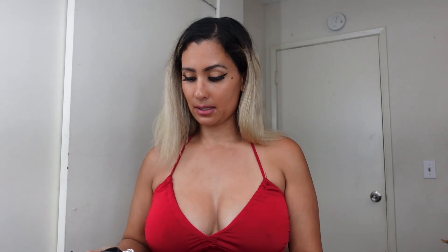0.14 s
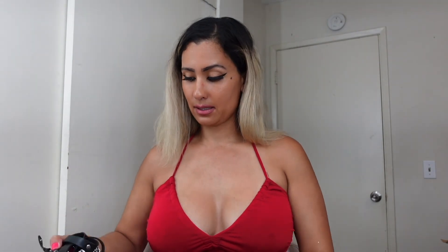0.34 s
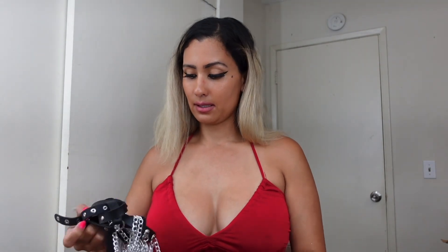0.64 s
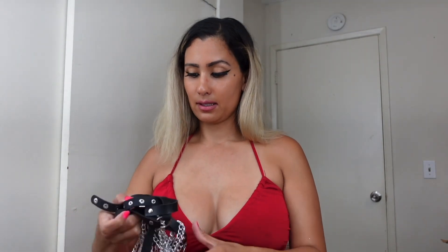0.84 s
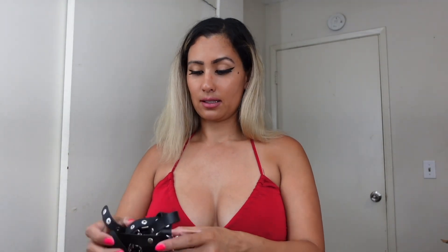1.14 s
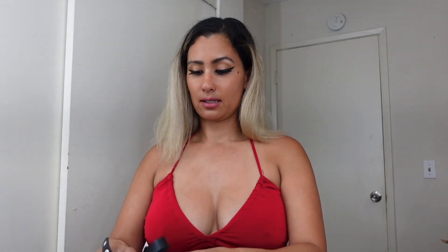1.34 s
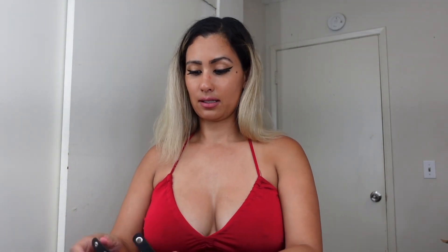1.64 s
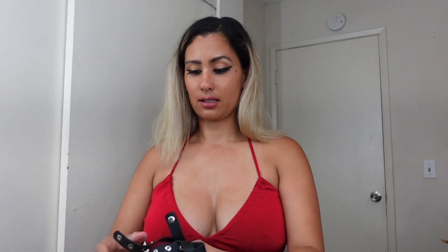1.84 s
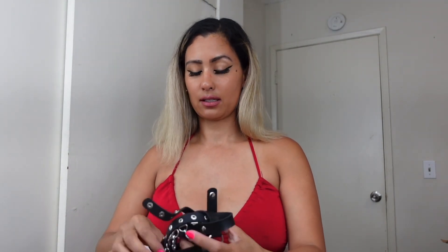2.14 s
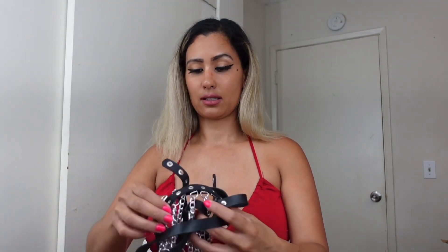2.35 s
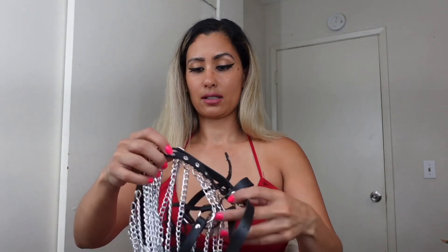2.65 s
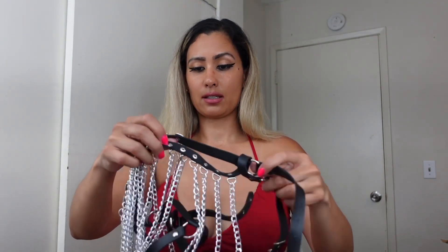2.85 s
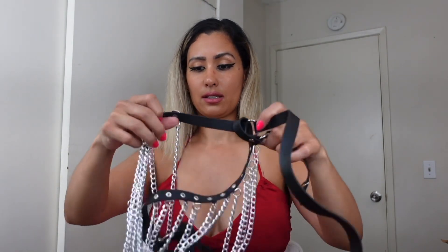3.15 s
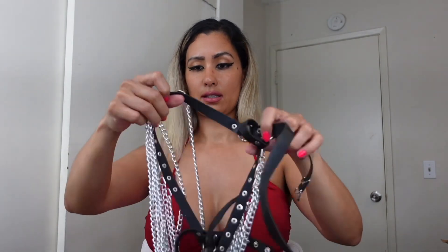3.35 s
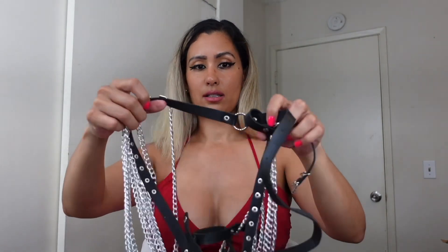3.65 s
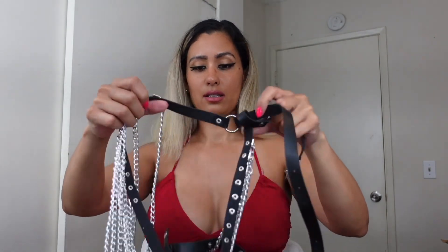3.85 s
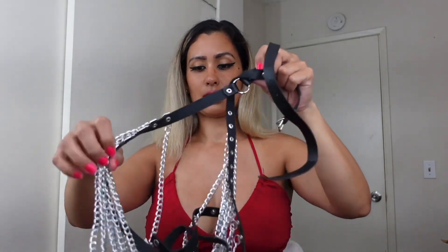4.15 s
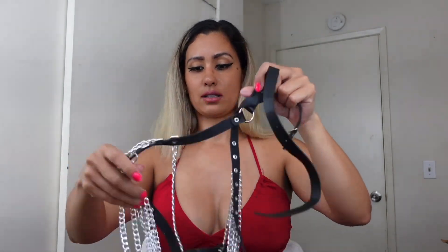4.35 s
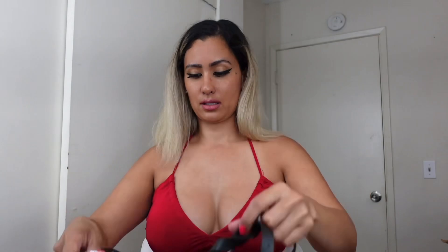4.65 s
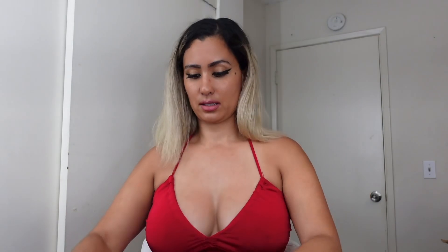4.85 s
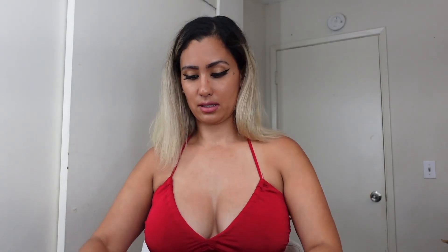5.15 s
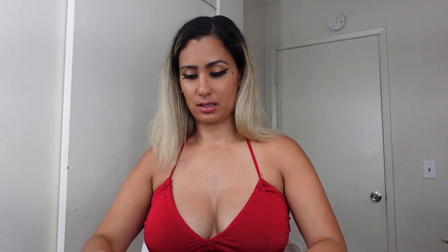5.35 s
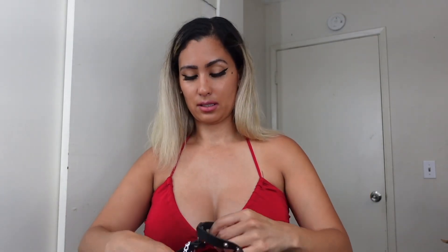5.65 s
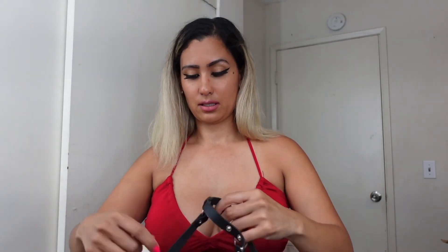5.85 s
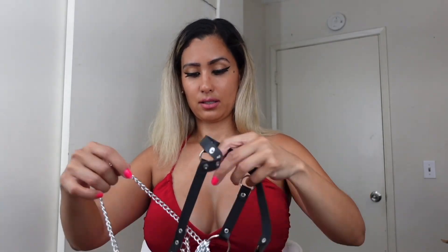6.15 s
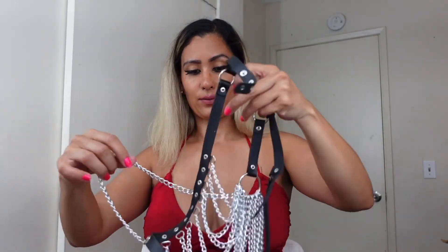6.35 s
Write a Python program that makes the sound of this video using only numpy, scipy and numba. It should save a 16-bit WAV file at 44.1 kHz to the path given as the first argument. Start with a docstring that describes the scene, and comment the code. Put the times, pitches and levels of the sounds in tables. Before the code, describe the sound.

Thin metal chains on leather straps clatter out of a crackling plastic bag, then jingle and tick lightly as hands untangle them in a small room.

```python
"""In a small room, thin metal chains on leather straps are pulled from a plastic bag, shaken and dropped on a table.
Links tick and ring in short high modes, bag and straps crackle lower down, and single hard knocks stand out.
Rattle, crackle and thuds are crowds of tiny fading sine waves; each knock adds a tick, a body ring and bounces.
The room hums softly underneath as shaped noise, wide in the two channels, while the chains sit near the middle."""
import sys
import numpy as np
from scipy import signal
from scipy.fft import rfft, irfft, next_fast_len
from scipy.io import wavfile
from numba import njit

SR = 44100
rng = np.random.default_rng(int(sys.argv[2]) if len(sys.argv) > 2 else 0)


def store_pcm(level_fs):
    """Save levels as 16-bit WAV."""
    pcm = np.round(np.clip(level_fs, -1, 1) * 32767).astype(np.int16)
    wavfile.write(sys.argv[1], SR, np.atleast_2d(pcm).T)


N = 286683  # samples, about 6.5 s


def undb(db):
    """Turn a level in dB into a gain."""
    return 10 ** (np.asarray(db) / 20)


def unit(x):
    """Scale a sound to an average strength (rms) of 1."""
    return x / np.sqrt(np.mean(x ** 2))


def high(x, hz):
    """Take away what lies below a pitch, with a second-order high-pass."""
    return signal.sosfilt(signal.butter(2, hz, "high", fs=SR, output="sos"), x)


def on_log(hz, table):
    """Read a table of (f/Hz, value) along a log-frequency axis."""
    f, v = np.transpose(table)
    return np.interp(np.log(hz + 1), np.log(f), v)


@njit
def rings(n, start, hz, t60, size):
    """Each grain is a sine wave that starts abruptly and fades by 60 dB in its t60."""
    out = np.zeros(n)
    for g in range(len(start)):
        # multiplying by this each sample turns the wave a little and shrinks it a little
        step = np.exp(2j * np.pi * hz[g] / SR - np.log(1000) / (t60[g] * SR))
        wave = size[g] + 0j
        for i in range(start[g], min(n, start[g] + int(t60[g] * SR))):
            wave *= step
            out[i] += wave.imag
    return out


def ring(s, hz, t60, size):
    """Place fading sines at times in seconds, with pitch and fade time kept in range."""
    start = (s * SR).astype(np.int64)
    return rings(N, start, np.clip(hz, 100, .45 * SR), np.clip(t60, 2e-4, 1), size)


LARGEST = 3.72  # no grain stands more than this many scatter steps over the smallest


def moments(rate_hz, scatter_db):
    """Pick random times, with many small grains and a few larger ones."""
    count = int(rate_hz * N / SR)
    steps = np.minimum(rng.exponential(size=count), LARGEST)
    s = rng.random(count) * N / SR
    sign = rng.choice([-1., 1.], count)
    return s, undb(scatter_db * steps) * sign


def grains(rate_hz, centre_hz, octaves, cycles, scatter_db, db):
    """Dense short snaps of scattered pitch, with little sound far below their centre pitch."""
    s, size = moments(rate_hz, scatter_db)
    hz = centre_hz * 2 ** (octaves * rng.standard_normal(len(s)))
    snaps = ring(s, hz, cycles / hz, size)
    return undb(db) * unit(high(snaps, 0.5 * centre_hz))


# colour of the hum, before its overall level is set: f/Hz, level/dB (per Hz)
HUM_COLOUR = [(20, -45), (45, -25), (60, -17.5), (100, -10.5), (125, -5.5), (185, -1.5), (300, -4),
              (450, -5), (800, -9.5), (1500, -11), (2500, -16.5), (4000, -22.5), (8000, -24), (16000, -33)]
# how alike left and right are in the hum: f/Hz, correlation (0 to 1)
HUM_LIKENESS = [(60, 0.54), (130, 0.36), (290, 0.37), (640, 0.094), (1400, 0.033), (3100, 0.91), (6800, 1),
                (15000, .99)]
# a soft resonance in the hum: f/Hz, width/Hz (at half height), level/dB
HUM_RESONANCE = (600, 120, -60.5)
HUM_DB = -54.5


def hum():
    """Steady air and machine noise of the house: random noise given a colour, plus one soft resonance."""
    size = next_fast_len(N)
    hz = np.arange(size // 2 + 1) * SR / size
    alike = np.clip(on_log(hz, HUM_LIKENESS), 0, 1)
    peak_hz, width_hz, peak_db = HUM_RESONANCE
    broad = undb(on_log(hz, HUM_COLOUR))
    resonance = 1 / (1 + (2 * (hz - peak_hz) / width_hz) ** 2)

    def noise(shape):
        return irfft(rfft(rng.standard_normal(size)) * shape, size)[:N]

    out = 0
    for shape, db in ((broad, HUM_DB), (resonance, peak_db)):
        mid = noise(shape * np.sqrt(1 + alike))
        side = noise(shape * np.sqrt(1 - alike))
        out = out + undb(db) * unit(mid + side * np.array([[1], [-1]]))
    return out


# pulls, shakes and drops: t/s of the peak, rise/s, fall/s, clatter level/dB,
# fine sliding ticks level/dB, free ringing level/dB, bag and strap crackle level/dB
HAND_MOVES = [(0.0, .02, .06, -32.5, -58, -44, -20), (.082, 0.0035, 0.054, -28.5, -57, -55, -20),
              (.12, .02, 0.062, -25.5, -55, -50.5, -21), (0.151, 0.036, 0.033, -22.5, -53, -37.5, -20),
              (.25, 0.022, 0.066, -55, -45, -41, -66), (0.288, 0.013, 0.053, -39.5, -50, -52, -51),
              (.42, 0.21, 0.11, -39, -52.5, -45, -37.5), (.58, 0.016, 0.032, -45, -43, -42, -42),
              (.623, 0.0046, .05, -39, -58, -49, -34.5), (.72, 0.022, 0.06, -46, -48.5, -49.5, -51),
              (.78, 0.029, 0.047, -68, -68, -64, -44), (.925, .002, 0.081, -45.5, -44, -53, -49.5),
              (.97, 0.024, 0.26, -43.5, -45, -48.5, -49), (1.1, .15, 0.086, -43, -48.5, -42.5, -43),
              (1.232, .01, 0.093, -51, -49, -44, -48.5), (1.305, 0.029, .07, -49.5, -48, -42.5, -55),
              (1.43, 0.028, 0.075, -50.5, -48, -47, -56), (1.51, 0.11, 0.15, -52, -63, -45, -53),
              (1.59, 0.058, .06, -49.5, -48.5, -49, -53), (1.76, 0.28, 0.14, -56.5, -65, -68, -53.5),
              (2.15, 0.035, 0.096, -54.5, -50, -49.5, -59), (2.35, .1, 0.23, -58.5, -49, -54, -80),
              (2.5, 0.089, 0.15, -54, -55, -44.5, -64), (2.585, .08, 0.19, -46.5, -46, -49, -57),
              (2.69, .06, 0.17, -51, -49.5, -56, -60), (2.9, 0.17, 0.016, -51, -49.5, -48, -74),
              (3.01, 0.021, 0.56, -51.5, -48.5, -43, -60), (3.29, 0.26, 0.17, -51, -50.5, -46, -52),
              (3.55, .03, 0.036, -73, -61, -53, -60), (3.84, 0.051, 0.13, -60, -52, -57, -77),
              (4.0, .15, 0.3, -57, -55.5, -60, -68), (4.092, 0.016, 0.043, -48, -41, -43, -72),
              (4.212, 0.0089, 0.037, -53, -42.5, -53, -70), (4.3, 0.047, 0.14, -49.5, -47.5, -46.5, -56),
              (4.534, 0.0023, 0.038, -33.5, -62, -45, -34), (4.59, 0.017, 0.056, -40.5, -56, -45, -40),
              (4.635, .04, 0.039, -37, -48, -42, -29.5), (4.69, 0.094, 0.15, -43, -41, -44, -43),
              (4.84, 0.046, 0.11, -43.5, -51, -43.5, -41), (4.94, 0.014, 0.056, -46, -45.5, -50, -49),
              (5.07, 0.078, 0.013, -52.5, -53, -56, -58), (5.14, 0.017, 0.16, -47.5, -53, -57, -54),
              (5.28, 0.18, 0.079, -51.5, -48, -48.5, -51), (5.48, 0.085, .03, -42, -44, -43.5, -40.5),
              (5.522, 0.016, .025, -36, -54, -38, -28.5), (5.58, 0.097, .1, -47.5, -51, -50, -48.5),
              (5.72, 0.11, 0.11, -71, -53.5, -50.5, -56), (5.82, 0.069, 0.057, -46.5, -50.5, -51, -50.5),
              (5.909, 0.047, 0.067, -51, -50, -47, -54.5), (6.05, 0.11, 0.086, -53, -51.5, -50, -64),
              (6.1, .03, 0.044, -66, -64, -40.5, -65), (6.17, 0.033, 0.094, -65, -64, -52.5, -68),
              (6.35, 0.19, 0.18, -64, -63, -55, -67), (6.465, .03, .08, -73, -61, -49, -70)]
SLOPE_DB = 10  # gained over each rise time, lost over each fall time


def moves():
    """Each move swells and dies away; moves add up as powers, giving one gain for each layer."""
    t = np.arange(N) / SR
    power = np.zeros((4, N))
    for s, rise, fall, *db in HAND_MOVES:
        near = slice(max(0, int((s - 6 * rise) * SR)), int((s + 6 * fall) * SR))
        away = np.maximum((s - t[near]) / rise, (t[near] - s) / fall)
        power[:, near] += undb(np.array(db)[:, None] - SLOPE_DB * away) ** 2
    return np.sqrt(power)


FLURRY_HZ, FLURRY_DB = 60, 1.6  # jumps a second, and how much their sizes scatter
FLURRY_S, CALM = .008, 2.5  # sag time, and the steady share under the jumps


def flurries():
    """Contacts come in quick flurries: a gain that jumps at random and sags again."""
    jumps = np.zeros(N)
    s, size = moments(FLURRY_HZ, FLURRY_DB)
    jumps[(s * SR).astype(int) % N] = np.abs(size)
    sagging = signal.lfilter([1], [1, -np.exp(-1 / (FLURRY_S * SR))], jumps)
    return unit(CALM + sagging)


# bag and strap snaps: grains a second, centre f/Hz, spread/octaves, cycles to fade,
# size scatter/dB, level/dB (before the moves set the gain)
CRACKLE_GRAINS = (1303, 1696, 0.8, 13.5, 3.0, -3)


def crackle():
    """Bag and straps crackle: short snaps in the lower treble."""
    return grains(*CRACKLE_GRAINS)


# knocking links: grains a second, centre f/Hz, spread/octaves, cycles to fade,
# size scatter/dB, level/dB (before the moves set the gain)
CLATTER_GRAINS = (2210, 5004, 0.6, 12.5, 2.5, 0)


def clatter():
    """Chains clatter: crowded short snaps, higher than the crackle."""
    return grains(*CLATTER_GRAINS)


# fine ticks: grains a second, centre f/Hz, spread/octaves, cycles to fade,
# size scatter/dB, level/dB (before the moves set the gain)
SLIDING_GRAINS = (3700, 10950, 0.75, 4.1, 0.92, 3.6)


def sliding():
    """Sliding chains make very dense, very short ticks, high up."""
    return grains(*SLIDING_GRAINS)


# modes of one link: f/Hz, spread from link to link (fraction of f), level/dB, fade by 60 dB/s
LINK_MODES = [(4150, .05, -13, .02), (6100, .05, -14, .02), (8300, .025, 0, .035), (10250, .015, -7, .025),
              (10900, .02, -2, .035), (15400, .025, -13, .025)]


def links(s, size):
    """Every hit rings another link: same modes, slightly different pitch and balance."""
    chance = rng.standard_normal((len(s), 2, len(LINK_MODES)))
    out = np.zeros(N)
    for k, (hz, spread, db, t60) in enumerate(LINK_MODES):
        mode_hz = hz * (1 + spread * chance[:, 0, k])
        mode_size = size * undb(db + 2.65 * chance[:, 1, k])
        out += ring(s, mode_hz, np.full(len(s), t60), mode_size)
    return out


def ringing():
    """Links ring freely: many random hits, each sounding the modes of one link."""
    hits = moments(rate_hz=497, scatter_db=1.5)
    return undb(-0.8) * unit(links(*hits))


# dull thuds: grains a second, centre f/Hz, spread/octaves, cycles to fade,
# size scatter/dB, level/dB (before the gain below)
THUD_GRAINS = (380.5, 349, 0.63, 4.5, 4, -6)
# gain of a low rumble under the handling: t/s, level/dB
HANDLING_RUMBLE = [(0, -48), (.8, -60), (1.68, -52.5), (2.0, -60), (2.46, -57.5), (3.2, -70), (3.5, -60),
                   (4.2, -57.5), (4.5, -72), (5.7, -57.5), (5.9, -64), (6.5, -57)]
THUD_DB = -13.5  # thuds follow the crackle gain, this far below it


def thuds(crackle_gain):
    """Low grains make dull thuds along with the crackle, and a rumble under the handling."""
    rumble_gain = undb(np.interp(np.arange(N) / SR, *np.transpose(HANDLING_RUMBLE)))
    gain = np.hypot(crackle_gain * undb(THUD_DB), rumble_gain)
    return gain * grains(*THUD_GRAINS)


# single hard knocks: t/s, body level/dB, body f/Hz, treble crack level/dB and
# link ring level/dB (both relative to the body, before the offsets and mode levels added in use)
HARD_KNOCKS = [(0.0396, -15, 1540, -29, -27), (0.0802, 0, 2050, -41, -46), (0.1085, -13, 1570, -33, -30),
               (0.2339, -22.5, 1980, -31, -18), (0.293, -18, 2350, -34, -31),
               (0.3302, -23.5, 1680, -20, -20), (0.4014, -24, 2310, -22, -20.5),
               (.4474, -32, 4000, -20, -25), (0.4821, -27.5, 1760, -18, -26), (0.5782, -28, 3950, -5, -12),
               (0.6204, -20, 4250, -31, -38), (0.6298, -23, 2340, -26, -32), (0.7196, -24, 4600, -22, -21),
               (.9234, -28, 2500, -8, -26), (1.2308, -37, 3500, -4, -6), (1.3025, -38, 2160, -12, -18),
               (1.4321, -29.5, 5000, -23, -22), (1.7565, -46, 4500, -3, -3), (1.785, -42, 4070, -19, -16),
               (2.043, -48, 940, -3, -13), (2.1188, -38.5, 4310, -8, -5), (2.157, -35, 6340, -20, -24),
               (2.2798, -35, 6100, -14, -36), (2.3, -38, 5600, -18, -21), (2.4214, -34.5, 4330, -21, -22),
               (2.5336, -34, 3880, -6, -17), (2.601, -28, 3700, -8, -14), (2.657, -33, 5000, -12, -16),
               (2.6732, -25, 5840, -18, -18), (2.801, -26.5, 4230, -26, -40),
               (3.0085, -33.5, 5700, -24, -15), (3.1238, -40, 4460, -15, -16),
               (3.2834, -41, 2430, -16, -18), (3.528, -35, 3920, -7.5, -14), (3.5937, -40, 4260, -13, -11),
               (3.934, -31.5, 6300, -20, -25), (4.069, -35.5, 2720, -4, -22), (4.09, -26, 5540, -25, -14),
               (4.2114, -28.5, 4500, -10, -15), (4.228, -24, 15400, -22, -25), (4.287, -30, 3940, -22, -22),
               (4.4893, -49, 8000, -12, 8), (4.5335, -22, 1150, -27, -27), (4.5455, -21, 2050, -21, -10.5),
               (4.599, -28, 3000, -8, -9), (4.642, -24, 2450, -7, -28), (4.7387, -33.5, 1000, -12, -9),
               (4.812, -37, 2500, -2, -18), (4.846, -32, 3600, 0, -19), (4.9363, -26, 5700, -23, -9),
               (5.143, -21.5, 5900, -28, -37), (5.302, -33, 5950, -4, -18), (5.504, -29, 1410, -6, -16),
               (5.5195, -23.5, 950, -16, -27), (5.53, -27, 1250, -22, -24), (5.56, -30, 4100, -16, -22),
               (5.6044, -33.5, 4170, -5, -14), (5.7928, -33.5, 2090, -20, -19),
               (5.8316, -32, 5040, -7, -13), (6.0442, -32.5, 5640, -9.5, -9), (6.41, -45, 5000, -6, -12),
               (6.4702, -43, 8000, -6, -10)]
BOUNCE_S = .04  # time over which the bounces lose 45 dB


def knocks():
    """A sharp tick, a short body ring, a scatter of bright bounces and one link set ringing."""
    s, peak_db, hz, crack_db, ring_db = np.transpose(HARD_KNOCKS)
    out = links(s, undb(peak_db + ring_db))
    tick_hz = np.full(len(s), 8000.)
    out += ring(s, tick_hz, 16.0 / tick_hz, undb(peak_db + crack_db - 5.0))
    chance = rng.standard_normal((len(s), 14, 3))
    for k in range(14):
        bounce = k > 0  # the first is the hit itself; bounces are weaker the later they come
        late = BOUNCE_S * .25 * np.abs(chance[:, k, 0]) * bounce
        size = undb(peak_db - 6.5 * bounce - 45 * late / BOUNCE_S) * (-1) ** k
        body_hz = hz * 2 ** (0.22 * chance[:, k, 1] * bounce)
        crack_hz = 9500 * 2 ** (0.5 * chance[:, k, 2])
        out += ring(s + late, body_hz, 10.6 / body_hz, size)
        out += ring(s + late, crack_hz, 20.0 / crack_hz, size * undb(crack_db + 10.5))
    return out


THIN_HZ = 664  # small light things radiate little below this


def chains():
    """The grain layers follow the moves; only thuds and rumble skip the cut that thins the rest."""
    clatter_gain, sliding_gain, ringing_gain, crackle_gain = moves()
    moving = crackle_gain * crackle() + clatter_gain * clatter()
    moving += ringing_gain * ringing() + sliding_gain * sliding()
    thin = high(flurries() * moving + knocks(), THIN_HZ)
    return thin + thuds(crackle_gain)


ROOM_T60_S, ROOM_DB = 0.2, -7.5  # fade by 60 dB, and tail level against the direct sound
ROOM_SIDE_DB, ROOM_SIDE_HZ = -15, 690  # left-right part: level before its low-pass, and the low-pass


def room(x):
    """Direct sound plus a short diffuse tail; mostly its lower part differs between the channels."""
    t = np.arange(int(.4 * SR)) / SR

    def tail(db):
        echoes = rng.standard_normal(len(t)) * undb(-60 * t / ROOM_T60_S) * (t > .002)
        return undb(db) * signal.fftconvolve(x, echoes / np.linalg.norm(echoes))[:N]

    middle = (x + tail(ROOM_DB)) / np.sqrt(1 + undb(2 * ROOM_DB))
    low_pass = signal.butter(1, ROOM_SIDE_HZ, fs=SR, output="sos")
    side = signal.sosfilt(low_pass, tail(ROOM_SIDE_DB))
    return middle + side * np.array([[1], [-1]])


DEEP_CUT_HZ = 92  # the deepest part of a thud does not carry


def scene():
    """Chains in the room over the hum."""
    return high(room(chains()), DEEP_CUT_HZ) + hum()


TOP_HZ = 15730


def record(dry):
    """The recorder cuts the top with a steep low-pass."""
    return signal.sosfilt(signal.ellip(14, .2, 75, TOP_HZ, fs=SR, output="sos"), dry)


dry = scene()
out = record(dry)
store_pcm(out)
```